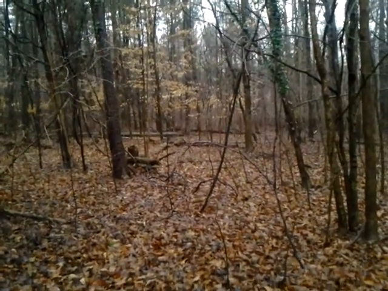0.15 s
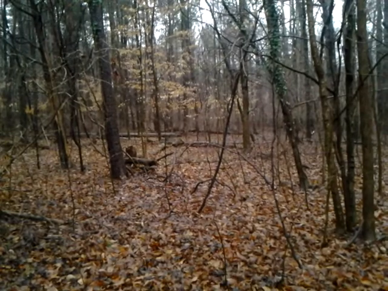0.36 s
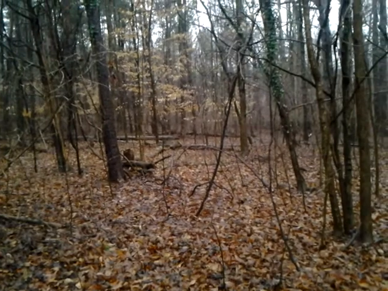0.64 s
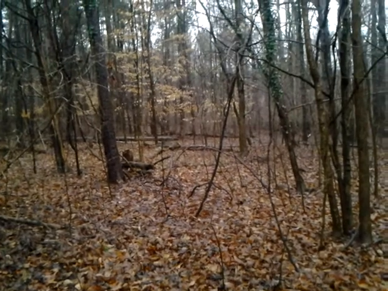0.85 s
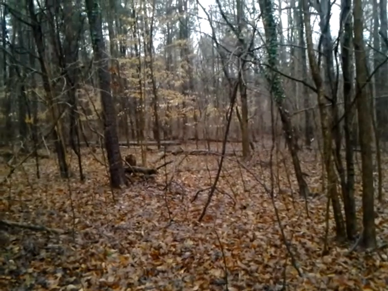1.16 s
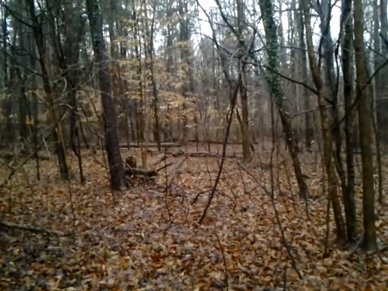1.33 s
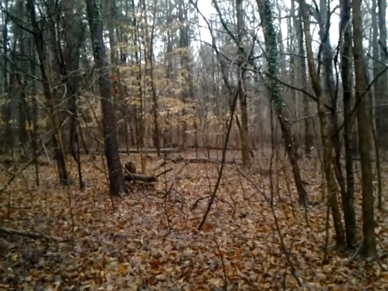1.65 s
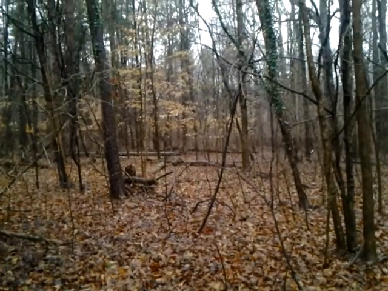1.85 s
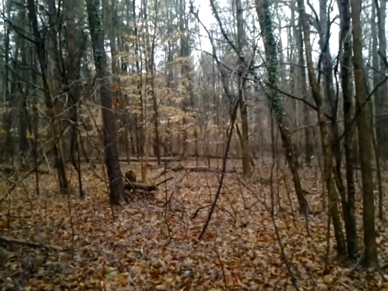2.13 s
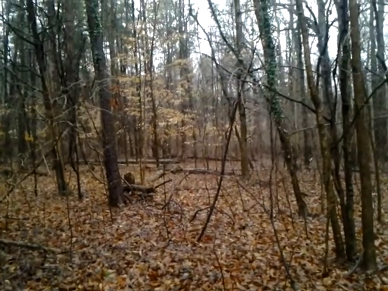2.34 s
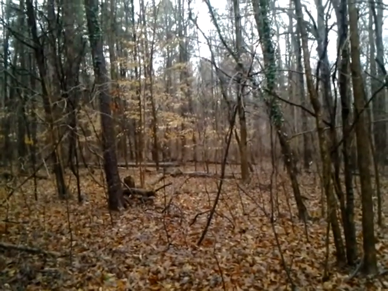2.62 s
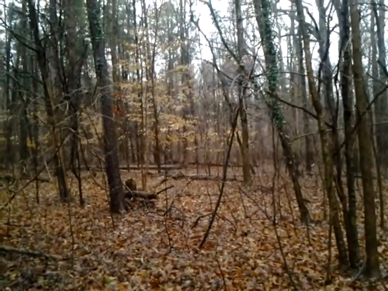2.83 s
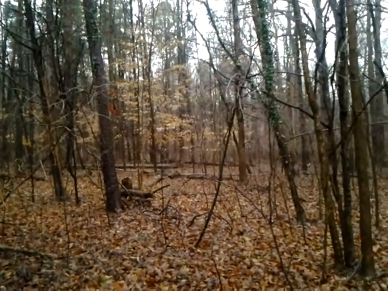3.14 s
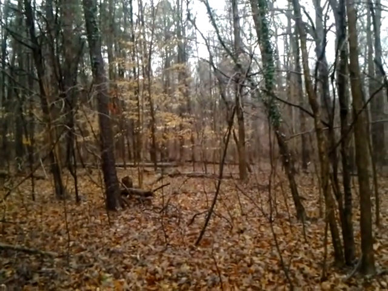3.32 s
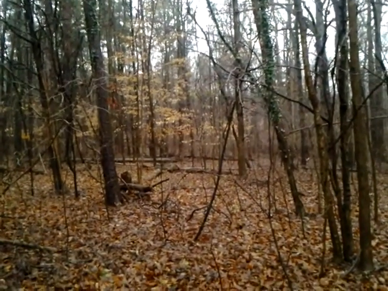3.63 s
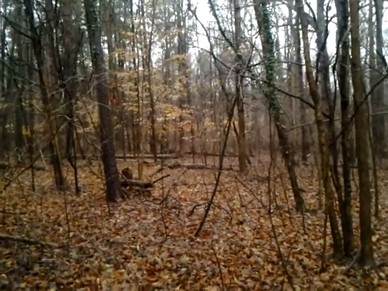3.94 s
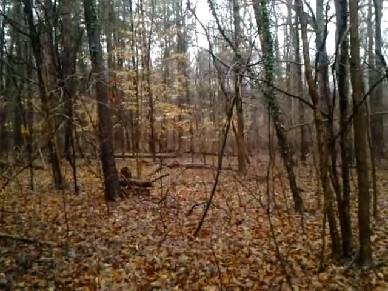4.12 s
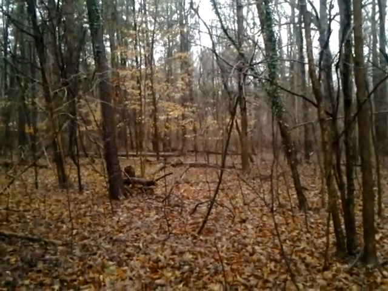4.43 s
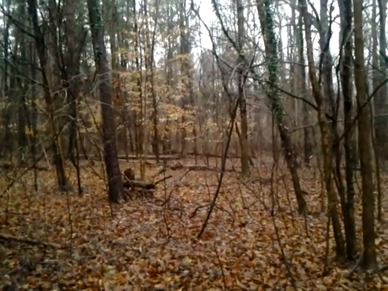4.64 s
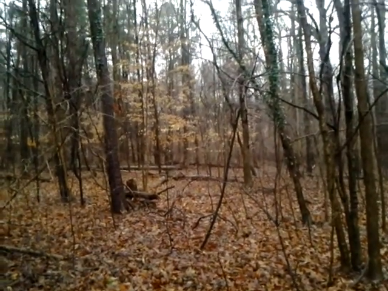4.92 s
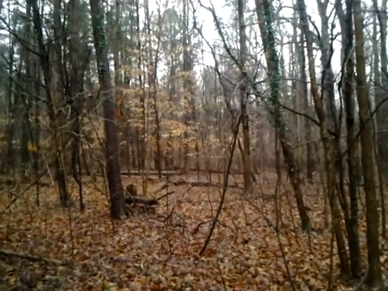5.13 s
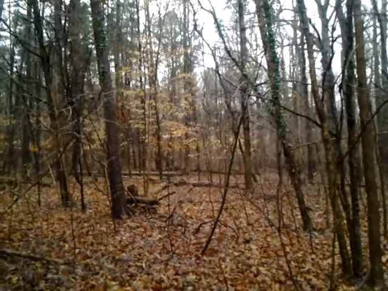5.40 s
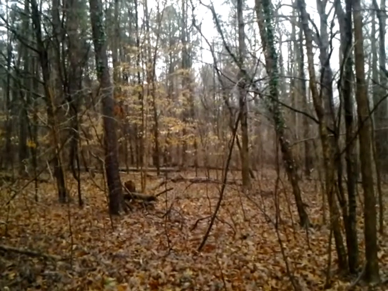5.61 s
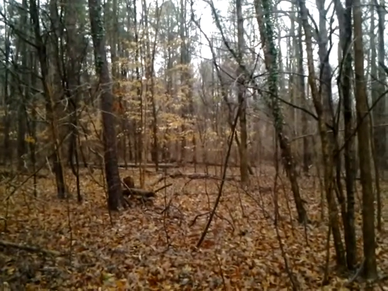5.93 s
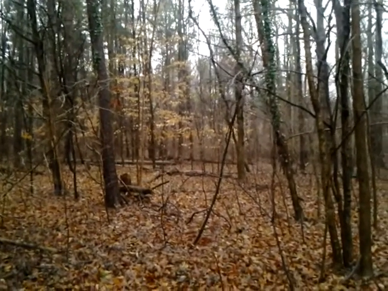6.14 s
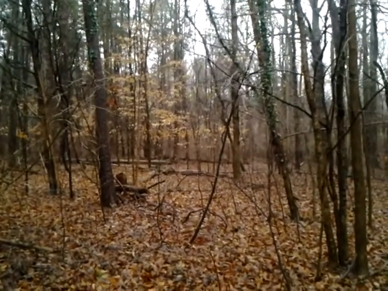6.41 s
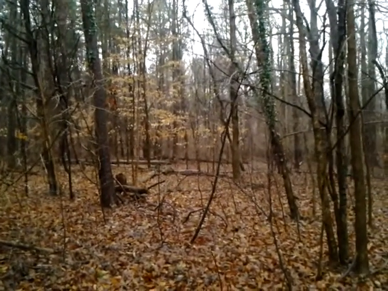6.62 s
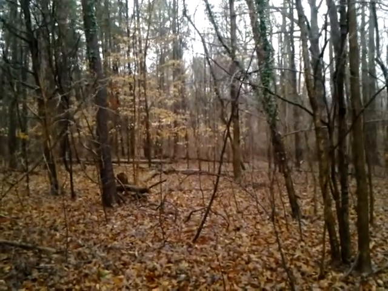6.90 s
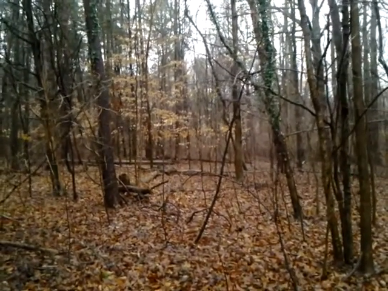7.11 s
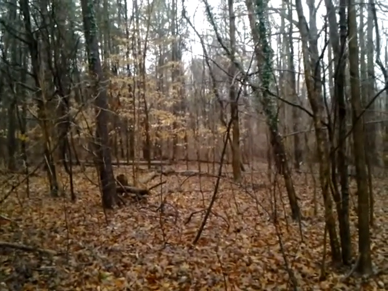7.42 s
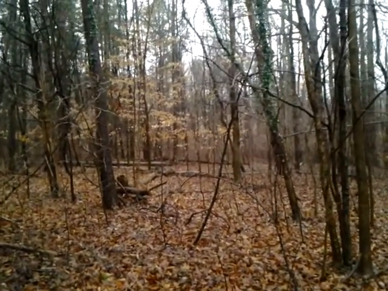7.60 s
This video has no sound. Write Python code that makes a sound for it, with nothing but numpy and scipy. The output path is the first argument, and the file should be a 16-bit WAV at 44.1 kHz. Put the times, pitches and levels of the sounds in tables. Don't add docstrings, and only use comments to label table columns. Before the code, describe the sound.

A handheld microphone in leafless woods picks up a busy crow flock at middle distance, some voices clear, others hoarse, scattered by the trunks into a hazy tail. Sharp little ticks of water on leaves pop up close, with a couple of brief leaf rustles. Calling is dense at first, sparse around six seconds, then renewed. Distant road drone swells gently beneath steady hiss.

```python
import sys
import numpy as np
from scipy import signal
from scipy.io import wavfile
from scipy.ndimage import uniform_filter1d

SR = 44100
rng = np.random.default_rng(int(sys.argv[2]) if len(sys.argv) > 2 else 0)


def transcribe(signal):
    frames = np.atleast_2d(signal).T
    limited = np.clip(frames, -1, 1)
    pcm = np.round(limited * 32767).astype(np.int16)
    wavfile.write(sys.argv[1], SR, pcm)


def makeup_ratio(level_db):
    decades = np.asarray(level_db, float) / 20
    return 10 ** decades


N = 342216
CREST = 0.42


def evened(x):
    return x / np.sqrt(np.mean(x ** 2) + 1e-20)


def read(points, hz):
    f, value = np.transpose(points)
    return np.interp(np.log(hz + 1), np.log(f + 1), value)


def add(mix, s, sound):
    at = round(s * SR)
    part = mix[max(at, 0):][:len(sound) + min(at, 0)]
    part += sound[max(-at, 0):][:len(part)]


def band(x, lo_hz, hi_hz):
    return signal.sosfilt(signal.butter(2, [lo_hz, hi_hz], "band", fs=SR, output="sos"), x)


def drift(chance, count, spacing):
    return np.array([np.interp(np.arange(count) / spacing, np.arange(len(c)), c) for c in chance])


def background():
    # (frequency [Hz], level per Hz [dB])
    floor = [(12, -60), (20, -3.5), (75, 0.5), (168, -15), (320, -21.5), (368, -17), (460, -18.5),
             (662, -17.5), (851, -18), (1220, -20), (4320, -29), (6760, -29), (7560, -32), (14800, -34.5),
             (16100, -30)]
    # (closest [s], half length [s], swell [dB])
    passes = [
        (1.96, 0.1, 2),
        (2.66, 0.5, 5.5),
        (3.995, 0.55, 5),
        (7.332, 0.043, 3.5),
    ]
    floor_db, drone_db = -53, -62

    frames, hz = N // 512 + 5, np.fft.rfftfreq(2048, 1 / SR)
    a, b = rng.standard_normal((frames, 1025, 2)).T
    spectra = (a + 1j * b) * makeup_ratio(read(floor, hz))[:, None]
    still = signal.istft(spectra, nperseg=2048, noverlap=1536)[1][:N]

    low = band(rng.standard_normal(N), 91.0, 140.0)
    higher = band(rng.standard_normal(N), 216.5, 343)
    t = np.arange(N) / SR
    swell_db = sum(db * np.exp(-((t - s) / half) ** 2) for s, half, db in passes)
    road = evened(low + 0.65 * higher) * makeup_ratio(drone_db + swell_db)
    return makeup_ratio(floor_db) * evened(still) + makeup_ratio(-3.5) * road


def caw(top_hz, length, db, bright_db, hoarse, chance):
    # (frequency [Hz], level [dB])
    throat = [(500, -10.5), (780, -16), (1080, -16.5), (1280, 1.5), (1550, 1.5), (1780, 4), (2000, -9),
              (2380, -12), (2560, -28.5), (3400, -16), (4300, -18), (6400, -17.5), (7500, -24.5),
              (11000, -38)]
    rise = CREST * length
    t = np.arange(round(length * SR)) / SR
    u = np.where(t < rise, t / rise - 1, (t - rise) / (length - rise))
    wobble, *unrest = drift(chance, count=len(t), spacing=130)
    flutter, slip = np.split(np.array(unrest), 2)

    hz = top_hz * (1 - .27 * u ** 2)
    turns = np.cumsum(hz * (1 + .04 * hoarse * wobble)) / SR
    k = np.arange(1, 13)[:, None]
    high = np.clip(np.log2(k * top_hz / 2000), 0, 1)

    lift_db = bright_db * np.clip(np.log2(k * top_hz / 1700), 0, 1)
    lift_db = lift_db - 11 * high * u ** 2
    lift_db = lift_db + 1.6 * chance[1:13, -1:] * (k > 3)
    lift_db = lift_db - 3.2 * u * (k == 3)

    rasp = 1 + (.5 + high) * hoarse * flutter
    smear = hoarse ** 2 * (1.7 + 4.6 * high) * slip
    phase = 2 * np.pi * k * turns + k * k + smear
    voice = (makeup_ratio(read(throat, k * hz) + lift_db) * rasp * np.cos(phase)).sum(0)
    return makeup_ratio(db) * 1.4 * voice * (1 - u ** 2) ** .45


def crows():
    # (crest [s], top pitch [Hz], level [dB], brightness [dB])
    clear = [(1.872, 853, -48, 4), (2.082, 837, -48, 4.5), (2.249, 850, -51, 3.5), (2.669, 843, -49, 4),
             (3.17, 837, -50, 5), (3.636, 844.5, -47.5, 3), (3.675, 766.4, -51.5, 3), (4.078, 780, -50, 2),
             (4.27, 830, -49.5, 2.5), (5.631, 796, -55, 1.5), (6.448, 774, -55.5, -2.5),
             (7.305, 738.6, -52, -3), (7.4, 757, -54, 9.5)]
    middle = [(0.17, 709, -55, 3.5), (1.33, 690, -69, -8), (0.355, 777, -59, 9.5), (0.434, 789, -49.5, 1),
              (0.559, 762, -51, 4), (0.658, 750, -49.5, -7), (0.733, 771, -58, 1), (0.807, 783.5, -51, 2),
              (1.052, 750, -56.5, 0.5), (1.175, 788.6, -49, 2.5), (1.624, 770.6, -51, 2.5),
              (1.712, 745, -51.5, -9), (2.174, 810, -53, 0), (2.484, 795, -55, 3.5),
              (2.839, 798, -49.5, 1.5), (3.522, 795, -50, 0.5), (4.855, 779, -51, 0.5),
              (4.994, 756.6, -49, 1), (6.629, 776, -50.5, 2), (6.901, 726, -53, 0.5),
              (7.47, 729.7, -49, -3), (7.6, 733, -68, 0), (7.727, 751, -61, 0)]
    hoarse_calls = [(0.021, 741, -51, -1.5), (0.21, 781, -59, -5), (0.284, 773, -54, -6),
                    (0.61, 715.5, -54, -6), (0.899, 740, -64, -8), (0.985, 760.5, -50, 0),
                    (1.241, 716, -56.5, -4), (1.456, 700, -56.5, 3.5), (1.518, 747, -51.5, -2.5),
                    (3.15, 738.4, -49, -1.5), (3.801, 806, -62.5, 8), (4.4, 763, -62, 7.5),
                    (6.663, 711.5, -61, 6), (7.057, 717, -62.5, 6), (7.179, 741.5, -49.5, 4),
                    (0.118, 778.4, -45.5, 1), (7.544, 749, -63, 8), (2.96, 767, -67, 3),
                    (2.369, 742, -65, -3), (5.78, 774, -64, -2)]
    # caws, length in s, hoarseness 0-1
    kinds = (clear, .105, 0.37), (middle, .112, 0.582), (hoarse_calls, .094, 0.695)
    out = np.zeros(N)
    for rows, length, hoarse in kinds:
        chances = rng.standard_normal((len(rows), 25, 80))
        for (s, hz, db, bright_db), chance in zip(rows, chances):
            add(out, s - CREST * length, caw(hz, length, db, bright_db, hoarse, chance))
    return out


def far_flock(count=64):
    # (time [s], level [dB])
    loudness = [
        (0, -57),
        (2.2, -58),
        (3.3, -60),
        (4.5, -63),
        (5.4, -65),
        (6.3, -70),
        (6.8, -61),
        (7.76, -61),
    ]
    out, chance = np.zeros(N), rng.standard_normal((count, 25, 80))
    for k, (late, pitch, soft) in enumerate(rng.random((count, 3))):
        call = caw(690 + 130 * pitch, .12, -6 * soft, 1.0, 0.68, chance[k])
        add(out, (k + late) * N / SR / count, call)
    s, db = np.transpose(loudness)
    return evened(out) * makeup_ratio(np.interp(np.arange(N) / SR, s, db))


def woods(x, gap):
    # (frequency [Hz], time to fall 60 dB [s])
    dying = [(700, 0.63), (1500, 0.83), (2400, 0.85), (4000, 0.83), (8000, 0.51)]
    taps = np.zeros(SR + 8000)
    at = np.arange(round(gap * SR), len(taps) - 20, 20)
    taps[at + rng.integers(0, 20, len(at))] = rng.choice([-1., 1.], len(at))
    hz, t, z = signal.stft(taps, SR, nperseg=256)
    build = 1 - .8 * np.exp(-t / .08)
    fade = makeup_ratio(-60 * t / read(dying, hz)[:, None])
    tail = signal.istft(z * fade * build, SR, nperseg=256)[1]
    return signal.fftconvolve(x, tail / np.linalg.norm(tail))[:N]


def whistles():
    # (start [s], length [s], top pitch [Hz], fall from the top near the end [Hz], level [dB])
    whistle_notes = [
        (0.04, 0.096, 2150, 170, -44),
        (4.28, .18, 2823, 300, -56.5),
    ]
    out = np.zeros(N)
    for s, length, top_hz, fall_hz, db in whistle_notes:
        u = np.linspace(0, 1, round(length * SR))
        hz = top_hz - fall_hz * ((u - .3) / 0.63) ** 2
        slip = 1.7 * drift(rng.standard_normal((1, 99)), count=len(hz), spacing=450)[0]
        tone = np.sin(2 * np.pi * np.cumsum(hz) / SR + slip)
        shape = signal.windows.tukey(len(hz), .4) * (1 - 0.49 * u)
        add(out, s, makeup_ratio(db) * tone * shape)
    return out


def ticks():
    # (time [s], peak level [dB], ring pitch [Hz], ring length [cycles])
    drips = [(0.345, -35.5, 2080, 3), (0.6194, -47, 2220, 2.7), (1.0044, -42, 2220, 3.4),
             (1.069, -43, 2290, 3), (1.135, -38.5, 2330, 5.1), (1.201, -35.5, 2160, 2.5),
             (1.4437, -41, 2200, 1.1), (1.93, -36, 2360, 2.3), (2.0145, -35, 2050, 1.8),
             (2.59, -34.5, 2060, 6.9), (3.371, -39, 2540, 3.3), (3.931, -44, 2410, 2.3),
             (4.5966, -34, 2600, 0.85), (4.717, -37, 5470, 5.3), (4.7411, -46, 5400, 2.3),
             (5.1043, -41, 2210, 1.5), (5.5745, -41.5, 2650, 2.8), (6.0035, -45, 2100, 2.6),
             (6.638, -33.5, 3190, 2.6), (6.8344, -47, 1910, 3), (7.4058, -34, 3150, 3.3),
             (7.5734, -51, 1990, 3), (7.658, -50, 2150, 3), (7.7194, -52, 2130, 2.7)]
    out, t = np.zeros(N), np.arange(400) / SR
    for (s, db, hz, cycles), noise in zip(drips, rng.standard_normal((len(drips), 400))):
        ring = np.sin(2 * np.pi * hz * t) * np.exp(-t * hz / cycles)
        ring = ring * (1 - np.exp(-t / 0.000059))
        snap = band(noise, 1500, 10000) * np.exp(-t / 0.00073)
        add(out, s, makeup_ratio(db) * (ring + 0.4 * snap))
    return out


def rustle():
    # (start [s], length [s], level [dB], scrape pitch [Hz])
    stirs = [
        (4.734, 0.15, -60, 5270),
        (5.248, 0.034, -64, 5400),
        (6.114, .13, -76, 7500),
    ]
    rise_s = 0.013
    out = np.zeros(N)
    for s, length, db, hz in stirs:
        t = np.arange(0, length, 1 / SR)
        crackle = makeup_ratio(2.5 * rng.exponential(1, len(t)))
        grit = rng.standard_normal(len(t)) * crackle
        shape = np.minimum(t / rise_s, 1) * makeup_ratio(db)
        add(out, s, evened(band(grit, 0.83 * hz, 1.2 * hz)) * shape)
    return out


def apart(x):
    # (frequency [Hz], share of cells [0-1])
    shares = [(2600, 0), (3200, .5), (4700, .5), (5300, .08), (7300, .2), (11500, .04), (12500, .45),
              (13300, .04)]
    hz, t, z = signal.stft(x, SR, nperseg=1024, noverlap=768)
    luck = rng.random((len(hz) // 12 + 1, len(t) // 7 + 1))
    luck = luck.repeat(12, axis=0).repeat(7, axis=1)[:len(hz), :len(t)]
    scramble = np.exp(2j * np.pi * rng.random(z.shape))
    z = z * scramble * (luck < read(shares, hz)[:, None])
    return 2 * makeup_ratio(-15) * signal.istft(z, SR, noverlap=768)[1][:N]


def scene():
    calls, whistled = crows(), whistles()
    sent = calls + makeup_ratio(-9) * whistled
    turn = np.pi * np.arange(N) / SR / .9
    echoes = woods(sent * np.cos(turn), .02) + woods(sent * np.sin(turn), .028)
    birds = calls + whistled + makeup_ratio(-3.5) * echoes + woods(far_flock(), .005)
    mid = birds + ticks() + rustle() + background()
    side = apart(mid)
    return np.array([mid + side, mid - side])


def starve(x):
    # (frequency [Hz], share of cells lost [0-1])
    lost = [(2800, 0), (3600, .06), (4200, .24), (4550, .1), (4900, .16), (5400, .03), (11000, .015),
            (15500, .14)]
    hz, t, z = signal.stft(x, SR, nperseg=1024, noverlap=768)
    luck = uniform_filter1d(rng.standard_normal((len(hz), len(t))), size=8, axis=1)
    luck = uniform_filter1d(uniform_filter1d(luck, size=4, axis=0), size=5, axis=1)
    rank = luck.argsort(axis=1).argsort(axis=1) / len(t)
    keep = np.where(rank < read(lost, hz)[:, None], .03, 1)
    return signal.istft(z * keep, SR, noverlap=768)[1][:, :N]


def band_limit(x):
    return signal.sosfilt(signal.butter(12, 16240, fs=SR, output="sos"), x)


def record(dry):
    # (frequency [Hz], width [Hz], share removed [0-1])
    narrow_dips = [(4220, 81, 0.4), (5070, 120, 0.3)]
    for hz, width, share in narrow_dips:
        dry = dry - share * signal.lfilter(*signal.iirpeak(hz, hz / width, SR), dry)
    edge = signal.firwin(511, 15850, window=("kaiser", 9), fs=SR)
    mix = starve(signal.oaconvolve(dry, edge[None], "same"))
    return band_limit(mix)


dry = scene()
out = record(dry)
transcribe(out)
```